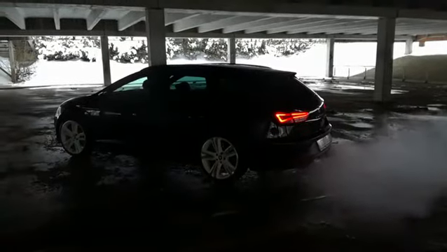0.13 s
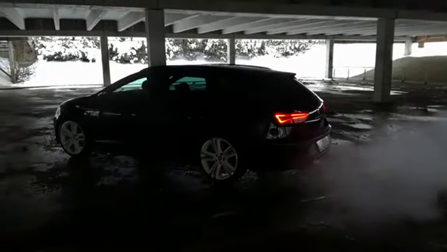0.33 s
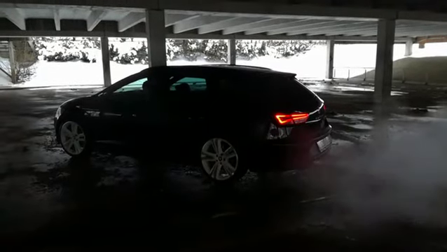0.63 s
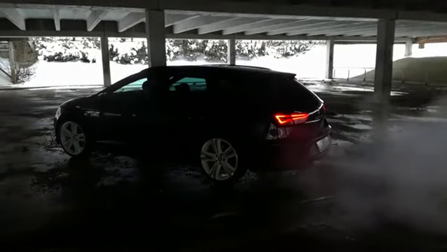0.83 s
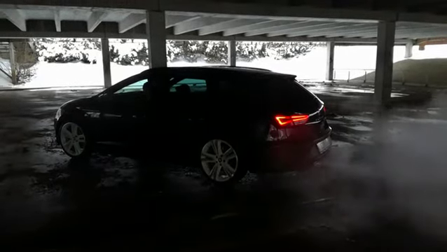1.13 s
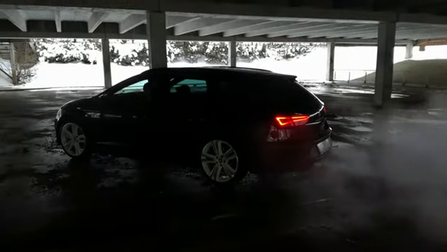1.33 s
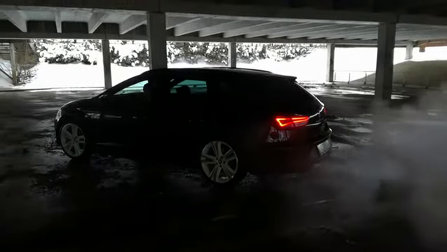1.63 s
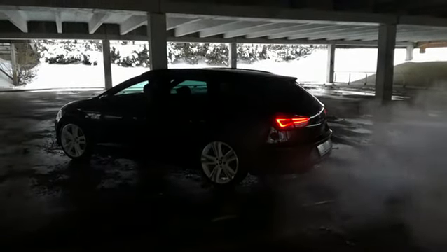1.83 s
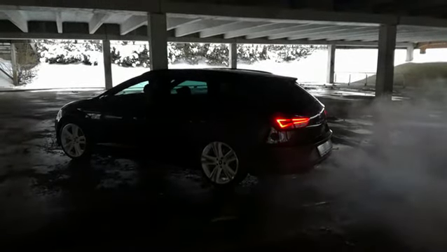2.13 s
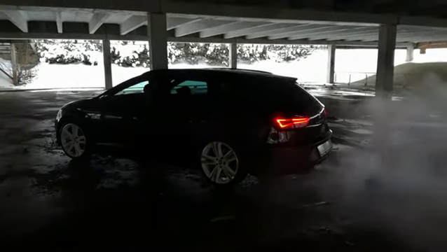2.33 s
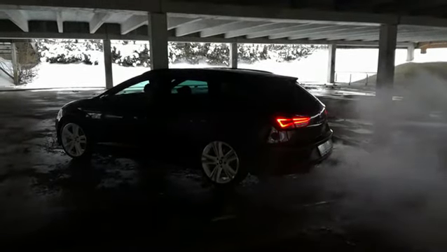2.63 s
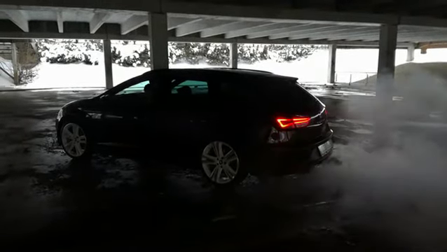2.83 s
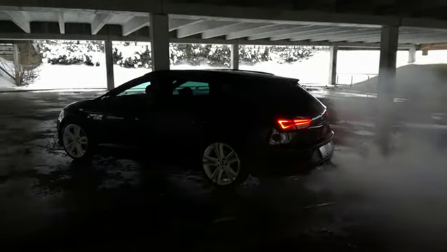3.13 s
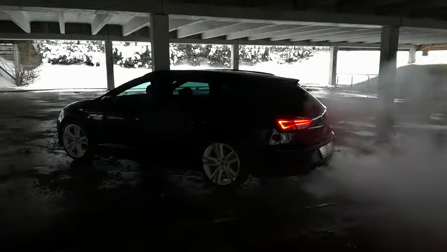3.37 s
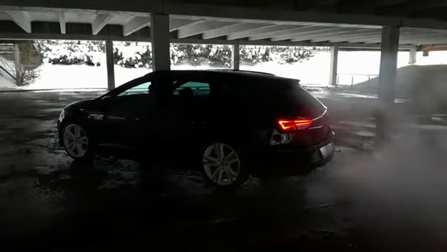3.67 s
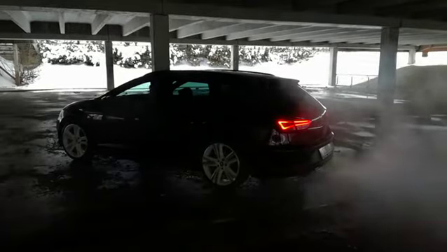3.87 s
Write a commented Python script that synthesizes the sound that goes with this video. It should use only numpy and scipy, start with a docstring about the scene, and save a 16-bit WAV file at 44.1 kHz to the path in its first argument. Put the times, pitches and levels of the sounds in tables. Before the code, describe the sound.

Car exhaust rumbles, dips, then revs up twice with sharp backfire cracks ringing off concrete.

```python
"""Revving car in a parking deck

A four-cylinder car is revved twice in a concrete deck, heard from a few metres by two close microphone ports.
The exhaust booms as its orders, tones locked to engine speed, sweep through low resonances.
Around the peaks and falls of the revs, unburnt fuel pops and bangs: noise bursts in a ringing tailpipe.
Filtered noise makes the gas rush, the rumble and the intake hiss; a turbo whistles faintly; the deck echoes.
"""
import sys
import numpy as np
from scipy import signal
from scipy.fft import rfft, irfft, next_fast_len
from scipy.io import wavfile
from scipy.ndimage import map_coordinates

SR = 44100
rng = np.random.default_rng(int(sys.argv[2]) if len(sys.argv) > 2 else 0)


def dump_mix(stems):
    """Bounce the given channels to the path in sys.argv[1] as a 16-bit WAV at rate SR."""
    frames = np.atleast_2d(stems).T  # one column per channel
    limited = np.clip(frames, -1, 1)  # hard clip at full scale
    pcm = np.round(limited * 32767).astype(np.int16)
    wavfile.write(sys.argv[1], SR, pcm)


N = 176400
TIME = np.arange(N) / SR


def amp(db):
    """Decibels to gain."""
    return 10 ** (np.asarray(db) / 20)


def unit(x):
    """Scales to rms 1."""
    return x / np.sqrt(np.mean(x ** 2) + 1e-20)


def curve(rows, axis=1):
    """A control curve at every sample, in straight lines between the rows."""
    table = np.transpose(rows)
    return np.interp(TIME, table[0], table[axis])


def at_hz(rows, hz):
    """Reads a table on a log-frequency axis."""
    f, value = np.transpose(rows)
    return np.interp(np.log(hz + 1), np.log(f), value)


def shaped(x, gain):
    """Filters x by a gain given as a function of frequency."""
    size = next_fast_len(x.shape[-1] + SR // 4)
    spectrum = rfft(x, size) * gain(np.fft.rfftfreq(size, 1 / SR))
    return irfft(spectrum, size)[..., :x.shape[-1]]


def causal(db_of, size=2048):
    """Minimum-phase impulse response: the given colour, with nothing before its start."""
    hz = abs(np.fft.fftfreq(size, 1 / SR))
    log_gain = np.log(amp(db_of(hz)))
    return np.fft.ifft(np.exp(np.conj(signal.hilbert(log_gain)))).real[:size // 2]


def drift(hz):
    """Slow random motion: straight lines between random points of rms 1, two points per cycle of hz."""
    steps = rng.standard_normal(2000)
    return map_coordinates(steps, [TIME * hz * 2], order=1)


def add(mix, s, sound):
    """Mixes a sound in at time s."""
    part = mix[max(round(s * SR), 0):][:len(sound)]
    part += sound[:len(part)]


# reverberation of the concrete deck: pitch_hz, t60_s
DECK_DECAY = [(100, 2.1), (800, 1.35), (1500, 0.95), (3500, 1.38), (6000, 0.57), (9000, 0.57), (15000, .35)]
EARLY_S, EARLY_DB = 0.022, 6.5  # denser energy of the first reflections
SLAP_S, SLAP_DB = 0.027, -15.5  # wall slap; its level is relative to the room level
PORT_LAG_S = .00058  # direct sound reaches the left port this much later


def deck(x, room_db):
    """Direct sound, a slap from a wall and the deck's tail, whose pitches die at their own rates, at two ports."""
    t = TIME[:SR + SR // 2]
    sparse = rng.random((2, len(t))) < .15
    taps = rng.standard_normal((2, len(t))) * sparse * (t > .003)
    taps *= 1 + amp(EARLY_DB) * np.exp(-t / EARLY_S)
    hz, when, bands = signal.stft(taps, SR, nperseg=256)
    decay = amp(-60 * when / at_hz(DECK_DECAY, hz)[:, None])
    tail = signal.istft(bands * decay, SR, nperseg=256)[1]
    # the tail is levelled against the same taps dying away with a t60 of 1 s
    echo = amp(room_db) * tail / np.sqrt(np.sum((taps * amp(-60 * t)) ** 2) / 2)
    echo[0, round(PORT_LAG_S * SR)] += 1
    echo[1, 0] += 1
    echo[0, round(SLAP_S * SR)] += amp(SLAP_DB + room_db)
    eased = x * np.minimum(TIME / .005, 1)
    heard = signal.fftconvolve(eased[None], echo, axes=1)[:, :N]
    return heard / np.sqrt(1 + amp(room_db) ** 2)


# intake and turbo hiss over time: start_s, level_db
HISS_LEVEL = [(0, -43), (.6, -46), (1.28, -50), (1.65, -40), (2.1, -41), (2.45, -35.5), (2.9, -40.5),
              (3.4, -40), (4, -46.5)]
# colour of the hiss, as density per Hz: pitch_hz, level_db
HISS_TONE = [(800, 7), (1600, 0.5), (2500, -2.5), (3600, -0.5), (4300, -10), (5500, -9), (6800, -18),
             (9000, -24.5), (15000, -35.5)]
# turbo whistle as the wheel speeds up and slows: start_s, pitch_hz, level_db
WHISTLE = [(1.7, 5500, -115), (2.3, 9030, -71), (2.47, 11300, -69), (2.7, 11050, -69), (3.05, 10000, -75),
           (3.4, 8890, -74), (4, 7000, -83.5)]
WHISTLE_WIDTH_HZ = 180


def turbo():
    """Diffuse intake hiss, and a thin whistle made fuzzy by narrow noise riding on a gliding tone."""
    hiss = unit(shaped(rng.standard_normal((2, N)), lambda f: amp(at_hz(HISS_TONE, f))))
    angle = 2 * np.pi * np.cumsum(curve(WHISTLE)) / SR
    slow_noise = lambda f: 1 / (1 + (f / WHISTLE_WIDTH_HZ) ** 2)
    fuzz = unit(shaped(rng.standard_normal((2, 2, N)), slow_noise))
    whistle = fuzz[0] * np.sin(angle) + fuzz[1] * np.cos(angle)
    return amp(curve(HISS_LEVEL)) * hiss + amp(curve(WHISTLE, axis=2)) * whistle


LOW_CUT_HZ = 48


def ringing_modes(modes, level):
    """Irregular firing, as noise, keeps a set of resonances ringing above a steep low cut."""
    def gain(f):
        peaks = sum(amp(db) / np.sqrt(width) / (1 + ((f - hz) / width) ** 2) for hz, width, db in modes)
        return peaks / np.sqrt(1 + (LOW_CUT_HZ / (f + 1)) ** 16)
    return amp(curve(level)) * unit(shaped(rng.standard_normal(N), gain))


# low modes of the deck, stirred by the exhaust: pitch_hz, width_hz, level_db
ROOM_MODES = [(59.9, 2.2, 3.5), (78.5, 9.9, -12.5), (98.5, 3.1, 11.5), (103, 5.9, -2), (145.5, 3.7, -0.5),
              (157, 8.2, 11)]
# rumble over time: start_s, level_db
RUMBLE_LEVEL = [(0, -26), (.3, -31.5), (.7, -44), (1.25, -39), (1.6, -24.5), (2.1, -27), (2.4, -30.5),
                (2.52, -23), (2.8, -29.5), (3.2, -28.5), (3.45, -21), (3.7, -48.5), (4, -45.5)]


def deck_rumble():
    """The low modes of the deck, stirred by the exhaust."""
    return ringing_modes(ROOM_MODES, RUMBLE_LEVEL)


# resonances of the silencer: pitch_hz, width_hz, level_db
SILENCER_MODES = [(195, 4.9, 3.5), (240, 39, -1.5), (291, 6, 4), (335.7, 4.1, -1), (378, 8, -6)]
# roar over time: start_s, level_db
ROAR_LEVEL = [(0, -33), (.3, -43.5), (.6, -51), (1.0, -47), (1.26, -50.5), (1.36, -28.5), (1.62, -29.5),
              (1.8, -35.5), (2.1, -39.5), (2.4, -29.5), (2.75, -39), (3.45, -42), (4, -58.5)]


def silencer_roar():
    """The silencer's own resonances, kept roaring by the irregular firing."""
    return ringing_modes(SILENCER_MODES, ROAR_LEVEL)


# gas rushing from the tailpipe over time: start_s, level_db
RUSH_LEVEL = [(0, -26.5), (.15, -34), (.4, -38.5), (.8, -48.5), (1.3, -50.5), (1.37, -33), (1.52, -36),
              (1.64, -25.5), (1.75, -31), (2.0, -39.5), (2.13, -35.5), (2.3, -28.5), (2.46, -22.5),
              (2.65, -26.5), (2.8, -30.5), (3.2, -35), (3.45, -27.5), (3.7, -38), (4, -42)]
# colour of the rush, as density per Hz: pitch_hz, level_db
RUSH_TONE = [(100, -10.5), (200, 1), (350, 4.5), (430, 0.5), (570, -1.5), (820, 4.5), (1100, -2),
             (1400, -3.5), (1900, -11.5), (3400, -15.5), (4500, -21.5), (6500, -31.5), (14000, -51.5)]
# tailpipe modes, sung by the rush and rung by the backfires: pitch_hz, level_db, t60_s
PIPE_MODES = [(66, -16, .3), (112, -9, .2), (258, -1.5, .09), (759, -10, .3), (839, -11, .3),
              (878, -10, .3), (1293, -6, .22), (1384, -7, .25), (1462, -12, .2), (1537, -6, .18),
              (1642, -12, .25), (1706, -13, .2), (2234, -13, .22), (4368, -20, .12)]
RUSH_PULSING, PUFF_SHARE = 3, 0.32  # puff strength over steady flow; decay as a share of a firing
RUSH_RING_DB, RUSH_RING_WIDTH_HZ, RUSH_RING_ABOVE_HZ = 14, 20.2, 500
RUSH_ROOM_DB = 4.5


def rush(turns):
    """A puff of turbulent gas with every firing; it keeps the tailpipe's higher modes singing."""
    puff = np.exp(-(turns % 1) / PUFF_SHARE)
    gas = rng.standard_normal(N) * (1 + RUSH_PULSING * puff)

    def gain(f):
        singing = sum(amp(db + RUSH_RING_DB) ** 2 / (1 + ((f - hz) / RUSH_RING_WIDTH_HZ) ** 2) ** 2
                      for hz, db, t60 in PIPE_MODES if hz > RUSH_RING_ABOVE_HZ)
        return amp(at_hz(RUSH_TONE, f)) * np.sqrt(1 + singing)
    return amp(curve(RUSH_LEVEL)) * unit(shaped(gas, gain))


# backfires: start_s, level_db, muffling_corner_hz, shock_front_db (levels relative)
BACKFIRES = [(0.075, -25, 3340, 4), (.083, -30.5, 2020, -4), (0.102, -29.5, 2940, -6),
             (.133, -18.5, 3520, -1), (0.151, -20, 3800, -1), (1.588, -26.5, 1590, -7),
             (1.603, -23, 1700, -3.5), (1.615, -20, 1900, -3), (1.623, -21, 1700, -6),
             (1.97, -28.5, 1800, -6), (2.473, -12, 13800, 4.5), (2.477, -18.5, 5000, -6),
             (2.485, -9, 13970, 6.5), (2.502, -25.5, 12000, 0), (2.6, -23, 3807, -1),
             (2.635, -22.5, 4210, 3), (2.657, -24.5, 3530, 4), (2.678, -28, 3460, 2),
             (3.059, -29.5, 2494, -5.5), (3.248, -25.5, 5500, -1), (3.309, -27, 3504, 5),
             (3.354, -26, 7003, 1), (3.393, -18, 14100, 11.5), (3.41, -27.5, 12020, 10),
             (3.423, -28, 15000, 18.5), (3.517, -28.5, 3500, 1.5)]
# colour of a bang, as density per Hz: pitch_hz, level_db
BANG_TONE = [(100, -2), (260, 2.5), (450, -10), (780, 3.5), (1100, -0.5), (1500, 3.5), (1900, -5.5),
             (2700, -5), (3400, -8), (4400, -11), (5500, -15), (7000, -22.5), (9000, -26.5), (11000, -31.5),
             (15500, -26.5)]
BURST_S, CRACK_S = .01, .0009  # decay of the flame and of the shock front
SPARKS_PER_S, SPARK_DB, AFTERBURN_S = 300, 5.5, .04  # initial crackle; the sparks fade as it burns out
THUMP_S, THUMP_DB, RING_DB = 0.001, -5.5, -7  # levels before the final mix
POP_DB, POP_ROOM_DB = 1, 1.5  # trim on every backfire; its share of the room


def backfire(db, corner_hz, shock_db):
    """Shock front, flame and crackling afterburn ring the pipe and push a thump; deep pops are muffled."""
    t = TIME[:SR // 3]
    flame = rng.standard_normal(len(t)) * (np.exp(-t / BURST_S) + amp(shock_db) * np.exp(-t / CRACK_S))
    sparks = rng.standard_normal(len(t)) * (rng.random(len(t)) < SPARKS_PER_S / SR)
    flame = flame + amp(SPARK_DB) * sparks * np.exp(-t / AFTERBURN_S)
    muffling = lambda f: -10 * np.log10(1 + (f / corner_hz) ** 4)
    colour = causal(lambda f: at_hz(BANG_TONE, f) + muffling(f))
    bang = signal.fftconvolve(flame, colour)[:len(t)]
    ring = np.zeros(len(t))
    for hz, level, t60 in PIPE_MODES:
        fading = amp(level + muffling(hz) - 60 * t / t60)
        ring += fading * rng.choice([-1, 1]) * np.sin(2 * np.pi * hz * t)
    thump = (1 - t / THUMP_S) * np.exp(-t / THUMP_S)
    swell = 1 - np.exp(-(t / CRACK_S) ** 2)
    body = amp(RING_DB) * ring + 2 * amp(THUMP_DB) * thump
    return amp(db + POP_DB) * (3 * bang + swell * body)


def backfires():
    """Every pop in its turn, echoing in the deck."""
    pops = np.zeros(N)
    for start, *row in BACKFIRES:
        add(pops, start, backfire(*row))
    return deck(pops, POP_ROOM_DB)


# level of the firing note, rising and falling unevenly: start_s, level_db
FIRING_LEVEL = [(0, -15), (.04, -23), (.075, -15), (.11, -23), (.15, -13), (.2, -25), (.26, -25), (.3, -14),
                (.35, -24), (.6, -35), (.78, -36), (.86, -28), (1.1, -21), (1.28, -23), (1.47, -35),
                (1.58, -10), (1.7, -23), (1.82, -21), (1.88, -14), (2.0, -12), (2.13, -22), (2.19, -10),
                (2.34, -31), (2.45, -17), (2.55, -30), (2.65, -24), (2.82, -31), (2.95, -26), (3.28, -32),
                (3.58, -25), (3.66, -18), (4, -13)]
# overtones together over time: start_s, level_db
GROWL_LEVEL = [(0, -41), (.28, -33.5), (.45, -42), (.75, -38), (1.24, -39.5), (1.36, -32), (1.48, -33.5),
               (1.6, -27.5), (1.74, -32.5), (1.9, -44), (2.1, -40.5), (2.19, -26), (2.44, -29),
               (2.7, -30.5), (3.0, -49), (4, -48.5)]
# overtones: multiple of the firing rate, level_db
FIRING_OVERTONES = [(2, 2.5), (3, -2), (4, -7.5), (5, -8.5), (6, -5)]
# response of the silencer to the overtones: pitch_hz, level_db
SILENCER_RESPONSE = [(160, 4), (195, -7.5), (238, -0.5), (262, -3), (292, 2), (318, -4), (348, 1),
                     (385, -6.5), (430, -14.5), (900, -13.5)]
# orders from unequal cylinders: multiple of the four-stroke cycle rate, level_db
UNEVEN_ORDERS = [(2, 2.5), (3, -0.5), (5, -2), (6, -11), (7, -11.5), (9, -8.5), (10, -9.5), (11, -9.5)]
# lope of those orders, strongest while the engine coasts and misfires: start_s, level_db
LOPE_LEVEL = [(0, 0.5), (.8, -1), (1.3, -5.5), (1.7, -3), (2.35, 0.5), (3.15, 1.5), (3.58, 0), (3.78, -7.5)]
# boom of pipe and deck that those orders sweep through: pitch_hz, level_db
BOOM_RESPONSE = [(43, -66), (52, -38.5), (60, -33.5), (70, -39), (80, -49), (95, -23.5), (113, -22),
                 (128, -27.5), (140, -31), (158, -26), (185, -42.5), (240, -45.5), (290, -44), (340, -46.5),
                 (450, -58.5)]
FIRING_WAVER, ORDER_WAVER, WAVER_HZ = 0.33, 0.45, 11  # depth of the waver against a steady tone; its rate
TONE_ROOM_DB = -8


def exhaust_note(hz, turns):
    """The firing note, overtones in step as one pulse per firing, and the lope of unequal cylinders."""
    def order(k, waver, offset=0):
        angle = 2 * np.pi * (k * turns + offset)
        in_step = (1 + waver * drift(WAVER_HZ)) * np.cos(angle)
        astray = waver * drift(WAVER_HZ) * np.sin(angle)
        return np.sqrt(2) * (in_step + astray)

    # the note itself lies 1 % below the firing rate
    note = amp(curve(FIRING_LEVEL)) * order(0.99, FIRING_WAVER)
    overtones = sum(amp(db + at_hz(SILENCER_RESPONSE, k * hz)) * order(k, ORDER_WAVER)
                    for k, db in FIRING_OVERTONES)
    # four firings make one four-stroke cycle
    uneven = sum(amp(db + at_hz(BOOM_RESPONSE, k * hz / 4)) * order(k / 4, ORDER_WAVER, rng.random())
                 for k, db in UNEVEN_ORDERS)
    growl = amp(curve(GROWL_LEVEL)) * overtones
    lope = amp(curve(LOPE_LEVEL)) * uneven
    return note + deck(growl + lope, TONE_ROOM_DB)


# engine speed: start_s, firings_per_s
ENGINE_SPEED = [(0, 117), (.3, 98.6), (.55, 84.5), (.8, 78.7), (1.0, 66.8), (1.27, 61), (1.35, 67),
                (1.45, 93.6), (1.55, 108), (1.63, 121), (1.75, 119), (1.95, 113.5), (2.12, 107.4),
                (2.2, 115.6), (2.33, 142), (2.46, 169), (2.8, 161), (3.1, 152.4), (3.4, 140.7), (3.7, 120),
                (4, 110)]


def scene():
    """The car in the deck: every source at both ports, the engine speed driving the exhaust and the rush."""
    hz = curve(ENGINE_SPEED)
    turns = np.cumsum(hz) / SR  # firings so far
    background = turbo() + deck_rumble() + silencer_roar()
    gas = deck(rush(turns), RUSH_ROOM_DB)
    return background + gas + backfires() + exhaust_note(hz, turns)


# microphone balance, left minus right: pitch_hz, level_db
PORT_BALANCE = [(380, 4.5), (700, -2), (2400, -1.5), (4400, -7), (6000, -17.5), (8100, -15), (11000, -10.5),
                (15000, 0)]
MONO_HZ, BASS_LAG_S = 395, 0.00022  # shared bass below this pitch, later on the left
OVERLOAD, EDGE_HZ = .95, 15750  # ceiling of the rounded peaks (full scale 1); top of the band


def record(dry):
    """Two close ports share the bass, the right one faces the pipe; peaks round off; then the band limit."""
    low = lambda f: 1 / (1 + (f / MONO_HZ) ** 8)
    late_bass = shaped(dry[1], lambda f: low(f) * np.exp(-2j * np.pi * f * BASS_LAG_S))
    left = late_bass + shaped(dry[0], lambda f: 1 - low(f))
    lean = lambda f: amp(at_hz(PORT_BALANCE, f) * (1 - low(f)))
    # the two gains keep the same total power
    right_gain = lambda f: np.sqrt(2 / (1 + lean(f) ** 2))
    left_gain = lambda f: lean(f) * right_gain(f)
    pair = np.array([shaped(left, left_gain), shaped(dry[1], right_gain)])
    pair = pair / (1 + (pair / OVERLOAD) ** 8) ** (1 / 8)
    band = signal.firwin(1023, EDGE_HZ, window=("kaiser", 9), fs=SR)
    return signal.oaconvolve(pair, band[None], "same")


dry = scene()
out = record(dry)
dump_mix(out)
```